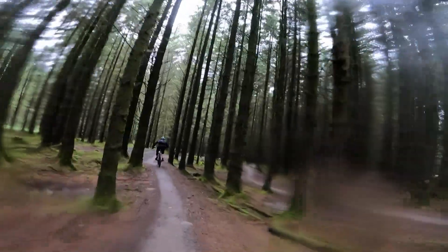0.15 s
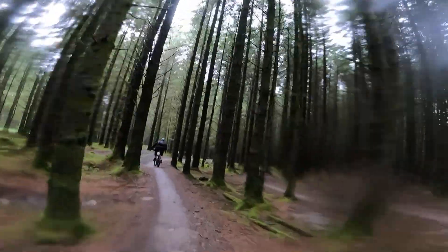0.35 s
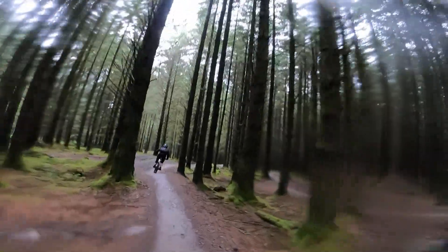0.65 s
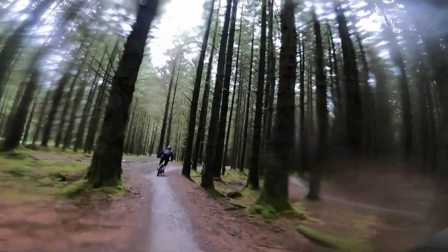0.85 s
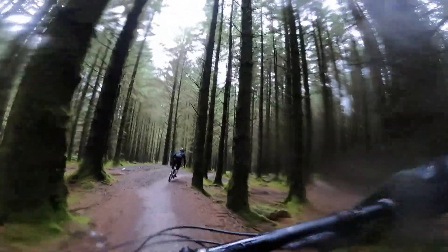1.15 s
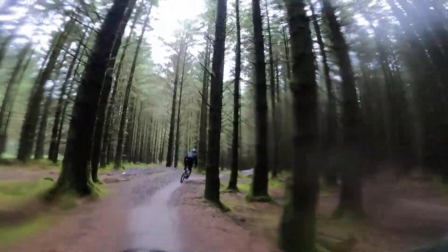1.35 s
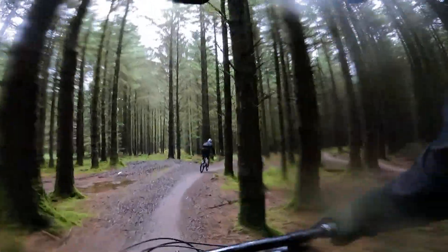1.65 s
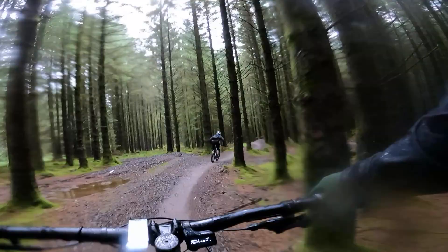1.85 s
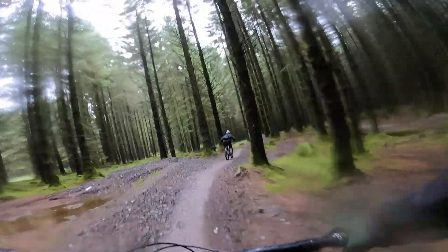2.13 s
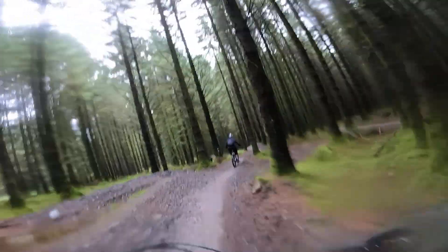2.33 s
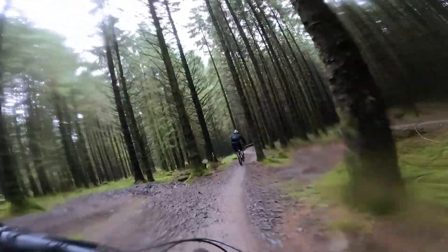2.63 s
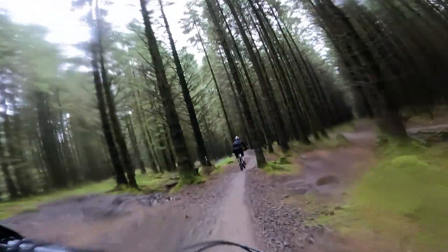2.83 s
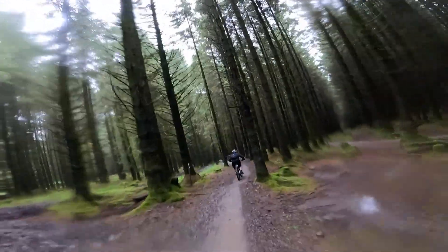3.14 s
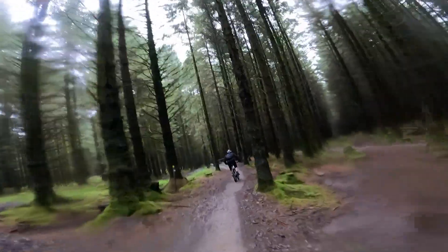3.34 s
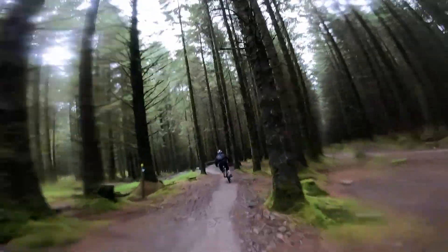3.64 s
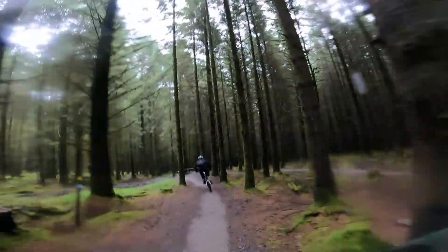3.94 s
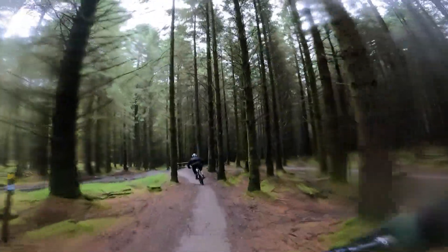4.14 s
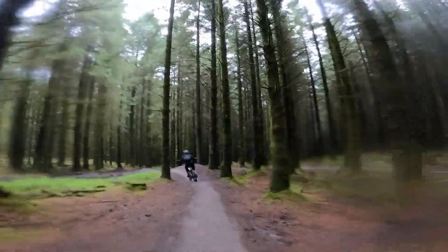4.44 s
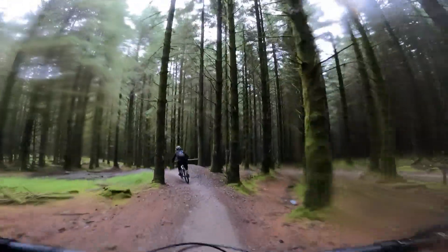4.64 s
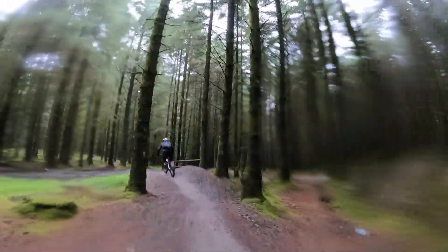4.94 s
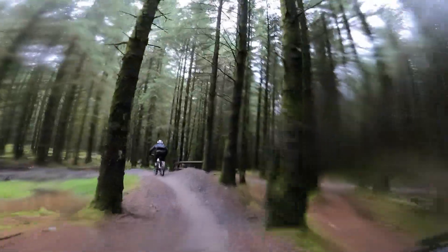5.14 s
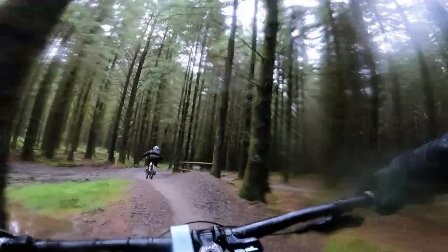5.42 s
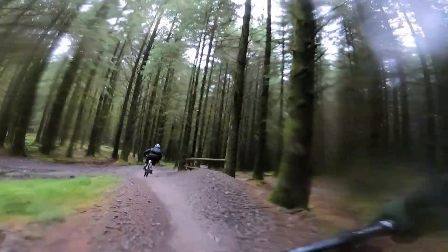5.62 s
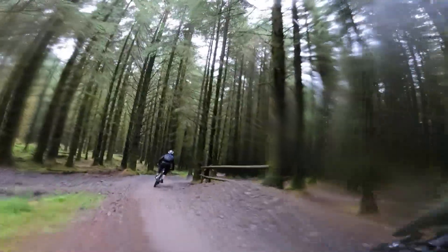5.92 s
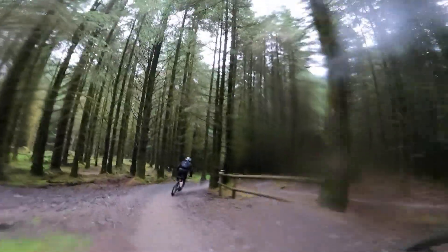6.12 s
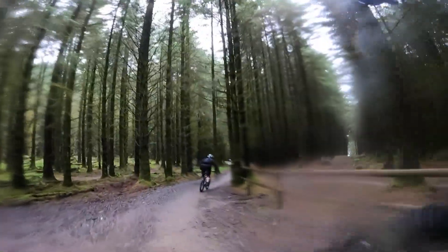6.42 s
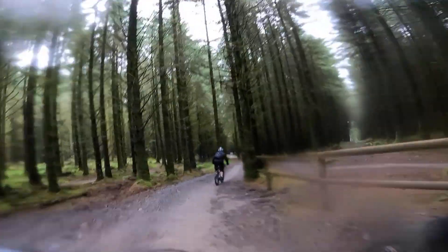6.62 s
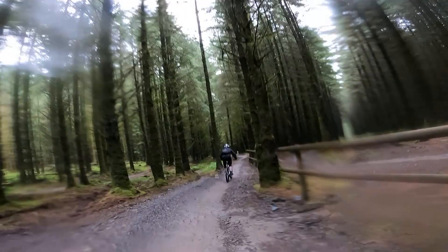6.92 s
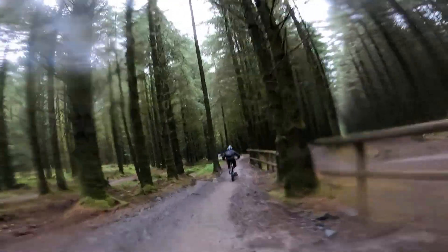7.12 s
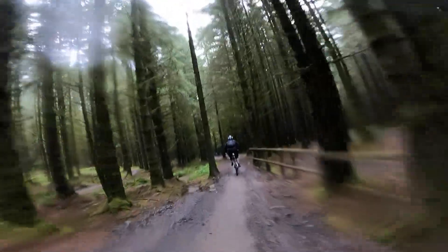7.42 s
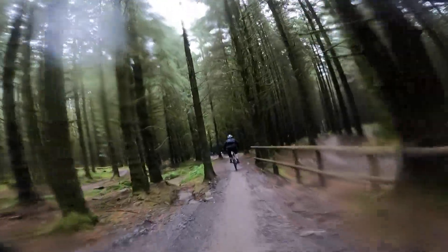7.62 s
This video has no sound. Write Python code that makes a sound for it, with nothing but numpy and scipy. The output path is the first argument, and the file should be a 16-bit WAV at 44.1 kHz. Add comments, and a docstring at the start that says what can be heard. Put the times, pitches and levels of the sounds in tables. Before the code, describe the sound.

A mountain bike descends a gravel forest trail, heard close up from a microphone carried by the rider. From the start the tyres drum and crunch over stones, grit patters and pebbles tick sharply off the frame. The slack chain knocks in irregular clusters, and gusts of wind buffet the microphone over a light hiss.

The rolling noise fades over a crest at about 1.6 to 1.9 seconds, then returns. It swells with a soft bump near 3.8 seconds, drops away most deeply from 4.1 to 4.4, and comes back with another soft bump. After a slight dip near 4.8, it fades again from 5.3 until a clear landing thump at 5.7. A shallower lull follows around 6.2 to 6.6 seconds. The freewheel buzzes faintly, a little stronger at the start and in the lulls. Rumble, chain knocks and ticks continue until about 7.8 seconds.

```python
"""A gravel forest trail, heard at a microphone carried by the rider of a descending mountain bike.
Stones drum on the tyres and excite the resonances of air cavity, sidewall and carcass; grit crunches.
Over crests the load falls and the rolling noise fades; some landings thump. Pebbles tick off the frame,
the chain knocks, the freewheel pawls buzz faintly and turbulent air buffets the microphone."""
import sys
import numpy as np
from scipy import signal
from scipy.fft import rfft, irfft, next_fast_len
from scipy.io import wavfile
from scipy.ndimage import map_coordinates

SR = 44100
rng = np.random.default_rng(int(sys.argv[2]) if len(sys.argv) > 2 else 0)


def wrap_up_sound(samples):
    """Save the sound to the file named by the first command line argument, as 16-bit audio."""
    columns = np.atleast_2d(samples).T
    # keep every value between -1 and 1, then stretch to whole-number steps
    tamed = np.clip(columns, -1, 1)
    steps = np.round(tamed * 32767).astype(np.int16)
    wavfile.write(sys.argv[1], SR, steps)


N = 342657

# resonance of the air ring inside the tyre: (frequency [Hz], bandwidth [Hz], gain [dB])
CAVITY_MODES = [(225, 31, 0)]
# resonances of the sidewall: (frequency [Hz], bandwidth [Hz], gain [dB])
SIDEWALL_MODES = [(283, 96, 0.5), (344, 113, -1.5), (416, 116, 0), (486.4, 123, 0), (556, 130, -1)]


def amp(db):
    """Amplitude ratio of a level in decibels."""
    return 10 ** (np.asarray(db) / 20)


def unit(x):
    """Normalisation to an rms of 1."""
    return x / np.sqrt(np.mean(x ** 2) + 1e-20)


def curves(rows):
    """Linear interpolation, to every sample, of each column after the time."""
    times, *columns = np.transpose(rows)
    return [np.interp(np.arange(N) / SR, times, column) for column in columns]


def wobble(rate):
    """Smooth random modulation: a spline through `rate` Gaussian knots a second."""
    return map_coordinates(rng.standard_normal(int(N * rate / SR) + 4), [np.arange(N) * rate / SR])


def swells(rows, half_width_s):
    """Superposed Gaussian changes of level, in dB."""
    return sum(db * np.exp(-((np.arange(N) / SR - s) / half_width_s) ** 2) for s, db in rows)


def filtered(x, response):
    """Linear filtering: the spectrum is multiplied by a frequency response."""
    size = next_fast_len(N + SR // 2)
    return irfft(rfft(x, size) * response(np.fft.rfftfreq(size, 1 / SR)), size)[..., :N]


def colour(points):
    """Spectral envelope through (frequency [Hz], gain [dB]) points on a logarithmic axis."""
    f, db = np.transpose(points)
    return lambda hz: amp(np.interp(np.log(hz + 1), np.log(f + 1), db))


def body(modes):
    """Modal superposition: the response of damped resonators, added with alternating sign."""
    return lambda f: sum((-1) ** k * amp(db) * 1j * f * width / (hz * hz - f * f + 1j * f * width)
                         for k, (hz, width, db) in enumerate(modes))


def burst(length_s, t60):
    """Time axis and envelope of a damped vibration: fast rise, exponential decay."""
    t = np.arange(round(length_s * SR)) / SR
    return t, amp(-60 * t / t60) * (1 - np.exp(-t / 0.00055))


def stones(per_second, spread_db):
    """Shot noise: random impacts with power-law sizes, many small and a few large."""
    chance, size, side = rng.random((3, N))
    strength = amp(-spread_db * np.log(size + 0.0018))
    return unit((chance < per_second / SR) * strength * np.sign(side - .5))


def tyre_load():
    """Contact noise follows load: levels of drumming, carcass and crunch, and the tread's dip, in dB."""
    # the trail under full load: (time [s], drumming level [dB], crunch level [dB])
    ground = [(0, -20, -46), (.37, -25.5, -44), (.45, -23.5, -40.5), (.6, -23, -45.5), (.75, -25.5, -42.5),
              (.9, -21, -36.5), (1.02, -21.5, -43), (1.35, -21.5, -43), (1.5, -20.5, -45),
              (2.1, -20, -40.5), (2.35, -23, -45), (2.5, -20, -43), (2.62, -19.5, -43), (2.9, -24.5, -45.5),
              (3.1, -26.5, -46), (3.33, -25.5, -42.5), (3.55, -24.5, -43.5), (3.7, -23.5, -41),
              (3.79, -18.5, -38.5), (3.86, -17, -39.5), (4.0, -22.5, -44.5), (4.47, -19, -37),
              (4.53, -17, -36), (4.6, -17, -38.5), (4.7, -21.5, -45), (5.04, -24.5, -46.5),
              (5.17, -18, -44.5), (5.3, -20.5, -43.5), (5.78, -17.5, -38.5), (5.9, -16, -40.5),
              (6.06, -19.5, -43), (6.13, -23.5, -45.5), (6.645, -24, -44), (6.68, -22, -40),
              (6.8, -21.5, -41.5), (6.9, -20.5, -41.5), (7.0, -21, -46.5), (7.06, -22.5, -39),
              (7.13, -24.5, -44), (7.29, -22.5, -39), (7.6, -25, -46), (7.77, -25.5, -45)]
    # crests unload the tyres: (lift [s], light [s], touch [s], drumming settled [s], tread gripped [s],
    # depth [dB], share of the depth regained at touch [0-1])
    crests = [(1.544, 1.684, 1.852, 2.01, 2.0, 18, 0.6), (4.041, 4.207, 4.397, 4.46, 4.468, 28, 0.78),
              (4.717, 4.814, 4.84, 4.88, 4.88, 8.5, 0.1), (5.317, 5.585, 5.724, 5.76, 5.75, 15.5, 0.75),
              (6.148, 6.414, 6.51, 6.67, 6.67, 11, 0.4)]
    touch_rise_s = 0.0061
    drum_db, crunch_db = curves(ground)
    drum_dip = tread_dip = 0
    for lift, light, touch, settled, gripped, depth_db, regained in crests:
        drum_dip += curves([(lift, 0), (light, 0.91 * depth_db), (touch, depth_db),
                            (touch + touch_rise_s, (1 - regained) * depth_db), (settled, 0)])[0]
        tread_dip += curves([(lift, 0), (light, depth_db), (touch, depth_db), (gripped, 0)])[0]
    carcass_db = drum_db + 0.58 * (crunch_db - drum_db) + 2.5 - 0.89 * tread_dip
    return drum_db - drum_dip, carcass_db, crunch_db - 0.41 * tread_dip, tread_dip


def wind():
    """Turbulence: eddies break on the microphone port in lumps, over a hiss of passing air."""
    # buffeting between gusts, and the hiss: (time [s], relative level [dB])
    buffet_levels = [(0, -32.5), (.6, -25), (1.3, -27), (1.75, -32), (2.1, -24), (2.5, -30.5),
                     (3.15, -27.5), (3.45, -29), (3.8, -24.5), (4.2, -35.5), (4.35, -30), (4.65, -27.5),
                     (5.0, -27.5), (5.3, -25), (5.65, -30.5), (6.1, -25), (6.45, -33), (6.8, -31),
                     (7.3, -24), (7.77, -28.5)]
    hiss_levels = [(0.0, -56.5), (0.26, -55.5), (0.45, -62), (0.76, -57.5), (0.89, -53.5), (1.04, -60),
                   (1.43, -59), (1.64, -57), (1.92, -59.5), (2.18, -56.5), (3.09, -59.5), (3.76, -58.5),
                   (4.05, -58.5), (4.22, -59.5), (4.44, -60), (4.59, -58.5), (4.91, -62.5), (5.13, -61),
                   (5.3, -60), (5.8, -59), (5.93, -57), (6.14, -60), (6.49, -59), (6.84, -57), (7.06, -55),
                   (7.31, -58.5), (7.47, -59), (7.77, -55)]
    # short gusts: (time [s], rise [dB])
    gusts = [(.49, 2), (.95, 5), (1.6, 5), (2.01, 6.5), (2.29, 4), (2.72, 8.5), (2.96, 6), (3.1, 7),
             (3.24, 8.5), (4.5, 8), (4.75, 8), (5.19, 4.5), (5.86, 8), (4.87, 7), (1.4, 4), (7.24, 6)]
    # spectra of buffeting and hiss: (frequency [Hz], relative density [dB])
    buffet_spectrum = [(8, -18.5), (22, -0.5), (34, -1), (70, -6), (140, -11), (300, -19), (800, -36),
                       (2000, -50), (8000, -87)]
    hiss_spectrum = [(2500, -2), (5000, -3.5), (6400, -1), (8000, -2.5), (10000, -8), (13000, -13.5),
                     (15700, -18)]
    buffet_db = curves(buffet_levels)[0] + swells(gusts, half_width_s=0.025) + 2.0
    eddies = amp(1.47 * wobble(15) + 1.74 * wobble(120)) * rng.standard_normal(N)
    hiss_db = curves(hiss_levels)[0] + 2.5 + wobble(29)
    hiss = unit(filtered(rng.standard_normal(N), colour(hiss_spectrum)))
    return amp(buffet_db) * unit(filtered(eddies, colour(buffet_spectrum))) + amp(hiss_db) * hiss


def freewheel():
    """Nearly periodic excitation: pawls click over the ratchet teeth and ring the hub shell."""
    # hub shell resonances: (frequency [Hz], bandwidth [Hz], gain [dB])
    hub_modes = [(2290, 220, -1.5), (3070, 190, 0), (3680, 320, -4.5)]
    # spells of louder buzz: (start [s], end [s], level [dB])
    spells = [(0, .35, -52.5), (1.7, 1.9, -54), (4.1, 4.4, -57), (5.5, 5.68, -52.5), (6.25, 6.35, -57)]
    idle_db, fade_s, tooth_hz = -60, .15, 58
    buzz_db = np.max([curves([(start - fade_s, idle_db), (start, db), (end, db),
                              (end + fade_s, idle_db)])[0] for start, end, db in spells], axis=0)
    teeth = np.cumsum((tooth_hz + 1.7 * wobble(1.6)) / SR)
    clicks = np.diff(np.floor(teeth), prepend=0) * amp(2.8 * rng.standard_normal(N))
    rattle = signal.fftconvolve(clicks, burst(.07, t60=.065)[1])[:N] * rng.standard_normal(N)
    return amp(buzz_db) * unit(filtered(rattle, lambda hz: body(hub_modes)(hz) ** 2))


def grit_spray(count=2500):
    """Free vibration: each thrown grain pings on the frame as a damped sine, louder under load."""
    when, size = rng.random((2, count, 1))
    hz = np.clip(2700 * np.exp(0.5 * rng.standard_normal((count, 1))), 900, 12000)
    age = np.arange(400)
    life = 6.5 * SR / hz  # samples to fade by a factor e
    strength = amp(-3.5 * np.log(size + 0.0044)) * np.minimum(2700 / hz, 1.4) ** 1.1
    grains = strength * np.exp(-age / life) * np.sin(2 * np.pi * hz * age / SR)
    patter = np.bincount(((when * N).astype(int) + age).ravel(), grains.ravel(), N + 400)[:N]
    _, _, crunch_db, tread_dip = tyre_load()
    return amp(crunch_db - 0.26 * tread_dip - 5.0) * unit(patter)


def pebbles():
    """Brief impacts are broadband: pebbles tick and snap on the frame, and big ones rattle longer."""
    # strikes: (time [s], relative level [dB], centre frequency [Hz], snap gain [dB])
    strikes = [(0.0272, -31.5, 2910, -27), (0.154, -33, 2590, -22), (0.275, -28, 2640, -22),
               (0.417, -35, 3280, -22), (0.4368, -30.5, 3340, -14), (0.6549, -37, 3840, -23),
               (0.6759, -31.5, 2610, -31), (.805, -37, 4000, -12), (0.885, -30, 3010, -24),
               (0.9208, -28.5, 3870, -34), (0.97, -37, 4000, -6), (1.11, -39, 3800, -30),
               (1.18, -30, 3740, -35), (1.2181, -42, 5000, -6), (1.2516, -33.5, 3580, -32),
               (1.291, -32, 2570, -23), (1.3942, -35.5, 4200, -11), (1.5165, -36, 3800, -9),
               (1.577, -35, 3110, -25), (1.6178, -32, 4060, -12), (1.961, -37, 4000, -25),
               (1.9944, -40, 4000, -28), (2.043, -29, 2490, -33), (2.4543, -34, 3210, -7),
               (2.505, -31, 4050, -9), (2.5825, -33, 2840, -25), (2.6334, -47, 13000, -9),
               (2.7472, -38, 3900, -28), (2.791, -31.5, 3800, -11), (2.8794, -37, 6000, -10),
               (2.972, -31, 2580, -32), (3.234, -34, 3160, -27), (3.3169, -32.5, 4400, -30),
               (3.337, -33, 3800, -17), (3.3834, -33.5, 4180, -34), (3.4835, -38, 2910, -25),
               (3.58, -43, 4000, -14), (3.705, -28, 2780, -17), (3.717, -29, 3260, -38),
               (3.7678, -37, 5000, -8), (3.797, -44, 13000, -8), (3.8488, -25, 3150, -40),
               (3.859, -33.5, 4500, -14), (4.014, -39, 4300, -25), (4.0324, -34.5, 3530, -22),
               (4.225, -47, 6000, -6), (4.4774, -28, 2650, -17), (4.495, -31, 3500, -14),
               (4.779, -31.5, 2183, -32), (5.098, -33.5, 3800, -10), (5.153, -44, 3200, -29),
               (5.3685, -36, 3680, -25), (5.49, -36, 3140, -32), (5.529, -37, 3120, -26),
               (5.7109, -39, 3200, -45), (5.795, -33, 2850, -32), (5.8946, -40, 4370, -28),
               (6.064, -30.5, 3060, -31), (6.1494, -35.5, 3980, -27), (6.292, -34, 2530, -20),
               (6.39, -33.5, 3200, -11), (6.616, -33, 2900, -30), (6.679, -33, 2980, -30),
               (6.8673, -34, 4170, -27), (7.356, -29, 3290, -10), (7.7015, -31.5, 3190, -6.5),
               (7.735, -35, 5000, -10)]
    # resonances of the bright snap: (frequency [Hz], bandwidth [Hz], gain [dB])
    snap_modes = [(6200, 1600, -6), (8750, 860, 1), (12100, 740, -7), (13900, 1800, -15)]
    _, snap_env = burst(0.067, t60=0.03)
    out = np.zeros(N + SR)
    for s, db, centre_hz, snap_db in strikes:
        t, tick_env = burst(0.067, t60=np.clip(0.035 * amp(0.5 * (db + 36.0)), .015, .07))
        hz = np.fft.rfftfreq(len(t), 1 / SR)
        tick, snap = rfft([tick_env, snap_env] * rng.standard_normal((2, len(t))))
        tick *= body([(centre_hz, 1.3 * centre_hz, 0)])(hz) ** 2 / (1 + (hz / 7000) ** 6)
        snap *= amp(snap_db + 5.0) * body(snap_modes)(hz)
        out[round(s * SR):][:len(t)] += amp(db + 5.0) * irfft(tick + snap, len(t))
    return out[:N]


def chain_knocks():
    """Impact excitation: the slack chain slaps the stay, giving two inharmonic partials and a clatter."""
    # slaps: (time [s], relative level [dB], pitch [Hz])
    slaps = [(0.406, -15, 1157), (0.563, -23, 1100), (0.676, -18.5, 1360), (0.7363, -21, 1170),
             (0.8127, -16.5, 1430), (0.8606, -16.5, 1365), (1.294, -17, 1410), (1.623, -23, 1240),
             (1.647, -31, 1510), (1.947, -27, 1060), (1.976, -22, 1233), (1.9988, -18.5, 1200),
             (2.062, -19, 1580), (2.334, -28, 1180), (2.462, -20.5, 1143), (2.828, -16, 1115),
             (2.885, -19.5, 896), (2.972, -21, 1530), (2.998, -16.5, 1246), (3.124, -26, 1300),
             (3.293, -19, 1290), (3.338, -19.5, 1210), (3.372, -17.5, 1243), (3.395, -24, 1400),
             (3.706, -18.5, 1320), (4.443, -19, 1380), (4.47, -18, 1340), (4.892, -26, 1190),
             (5.074, -24, 1394), (5.102, -23, 1265), (5.178, -25, 1010), (5.7353, -15, 1175),
             (5.8, -17, 1236), (6.039, -15.5, 1413), (6.348, -27, 940), (6.389, -28.5, 1770),
             (6.7193, -27, 1036), (6.995, -37.5, 650), (7.052, -14.5, 1254), (7.198, -20.5, 1430),
             (7.063, -19, 870), (7.266, -15.5, 1170), (7.298, -24, 1290), (7.357, -19, 1357)]
    sag_per_s, jangle_turns = 1.8, 0.076  # fractional fall of pitch; rms phase drift after 1 ms
    rings, clatter = np.zeros((2, N + SR))
    t, env = burst(.1, t60=0.056)
    env *= 1 - np.exp(-t / 0.00059)
    for s, db, pitch_hz in slaps:
        phase = rng.random((2, 1))
        drift = np.cumsum(rng.standard_normal((2, len(t))), axis=1) / np.sqrt(SR / 1000)
        cycles = pitch_hz * t * (1 + sag_per_s * (.01 - t / 2))
        low, high = np.sin(2 * np.pi * (np.outer([1, 1.4], cycles) + phase + jangle_turns * drift))
        rings[round(s * SR):][:len(t)] += amp(db - 3.5) * env * (low + 0.16 * high)
        clatter[round(s * SR):][:len(t)] += amp(db + 9.5) * env ** 1.34 * rng.standard_normal(len(t))
    return (filtered(rings[:N], lambda hz: 1 / (1 + (hz / 2600) ** 4))
            + filtered(clatter[:N], lambda hz: body([(1300, 1200, 0)])(hz) ** 2 / (1 + (hz / 1900) ** 4)))


def landings():
    """Impulse response: cavity and sidewall thump softly as the tyre takes the load again."""
    # touchdowns: (time [s], relative level [dB])
    touchdowns = [(3.805, -21), (4.403, -19.5), (5.732, -5)]
    blows = np.zeros(N)
    for s, db in touchdowns:
        blows[round(s * SR)] = amp(db + 31)
    return filtered(blows, lambda hz: body(CAVITY_MODES + SIDEWALL_MODES)(hz) / (1 + 1j * hz / 700) ** 2)


def thuds():
    """Compliant contact: rubber acts as a low-pass filter on stone impacts."""
    return filtered(stones(1500, spread_db=2.0), lambda hz: 1 / (1 + 1j * hz / 2500) ** 3)


def sidewall():
    """Incoherent modes: each sidewall resonance is struck by its own stones and wavers by itself."""
    return unit(sum(amp(db + 1.3 * wobble(6))
                    * unit(filtered(thuds(), lambda f: body([(hz, width, 0)])(f) ** 2))
                    for hz, width, db in SIDEWALL_MODES))


def rolling():
    """Forced vibration: stones drive cavity, sidewall, carcass and grit; rough patches modulate all."""
    # coarser gravel favours the sidewall: (time [s], sidewall gain [dB])
    coarseness = [(0, -2), (.5, 3), (1, 0.5), (2.5, -2), (3.5, 0), (4, -2.5), (4.45, 0), (4.7, -3),
                  (6, -1.5), (6.5, -1.5), (7.77, -1)]
    # the cavity hum briefly blooms or falls back: (time [s], change [dB])
    blooms = [(.04, -1.5), (.94, 6), (1.33, 6.5), (2.16, 1), (2.29, 3), (2.38, -3), (2.6, 4), (3.4, 2.5),
              (3.48, -2), (3.92, 2.5), (4.0, -4.5), (4.09, 7), (4.78, 6), (5.26, 0.5), (6.84, 1.5),
              (7.04, -2.5), (7.14, 5.5), (7.47, -9), (7.62, 5.5)]
    # carcass resonances: (frequency [Hz], bandwidth [Hz], gain [dB])
    carcass_modes = [(815, 340, -1), (956, 136, 3.5), (1146, 170, -2.5), (1533, 350, -3.5)]
    # crunching grit, and fine grit sizzling off the tread: (frequency [Hz], relative density [dB])
    crunch_spectrum = [(1100, -8.5), (1800, -1.5), (3100, -4.5), (5000, -11), (8000, -22), (11000, -44),
                       (15700, -47.5)]
    sizzle_spectrum = [(5000, -20), (8000, 6), (10000, -2), (13000, -4), (15700, 1)]
    drum_db, carcass_db, crunch_db, _ = tyre_load()
    sidewall_db, = curves(coarseness)
    roughness = wobble(28)
    hum_db = swells(blooms, half_width_s=0.045) + 0.91 * wobble(4.2)
    hum = amp(hum_db) * unit(filtered(thuds(), body(CAVITY_MODES)))
    drum = unit(hum + amp(sidewall_db) * sidewall())
    carcass = unit(filtered(stones(2500, spread_db=3.0),  # rubber contact damps the treble
                            lambda hz: body(carcass_modes)(hz) / (1 + (hz / 1800) ** 6)))
    grit = stones(9000, spread_db=2.0) + 1.3 * rng.standard_normal(N)
    crunch = unit(filtered(grit, colour(crunch_spectrum)))
    sizzle = unit(filtered(stones(6000, spread_db=2.5), colour(sizzle_spectrum)))
    return (amp(-67 + .8 * (crunch_db + 44) + .7 * roughness) * sizzle
            + amp(drum_db - 1.22 + 0.9 * roughness + 0.64 * wobble(11)) * drum
            + amp(carcass_db - 2.0 + 2.0 * roughness) * carcass
            + amp(crunch_db - 1.0 + roughness + 0.76 * wobble(60) + wobble(9.0)) * crunch)


def scene():
    """Superposition: the pressures of all sources add at one microphone."""
    return (rolling() + landings() + grit_spray() + pebbles() + chain_knocks() + freewheel() + wind())[None]


def record(dry):
    """Saturation rounds off the peaks; the port's treble notch and a band limit shape the spectrum."""
    # response of the microphone port: (frequency [Hz], gain [dB])
    port_notch = [(9500, 0), (10400, -1.5), (11200, -5), (12000, -1), (15700, -3)]
    ceiling, band_limit_hz = 0.58, 15770
    rounded = dry / (1 + np.abs(dry / ceiling) ** 6) ** (1 / 6)
    return filtered(rounded, lambda hz: colour(port_notch)(hz) * (hz < band_limit_hz))


dry = scene()
out = record(dry)
wrap_up_sound(out)
```